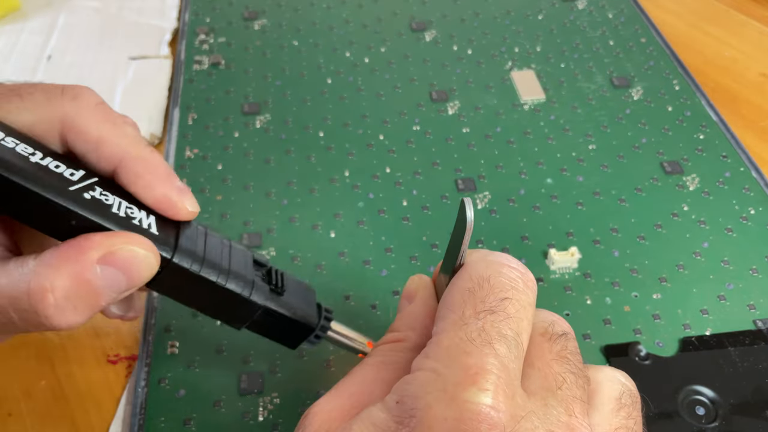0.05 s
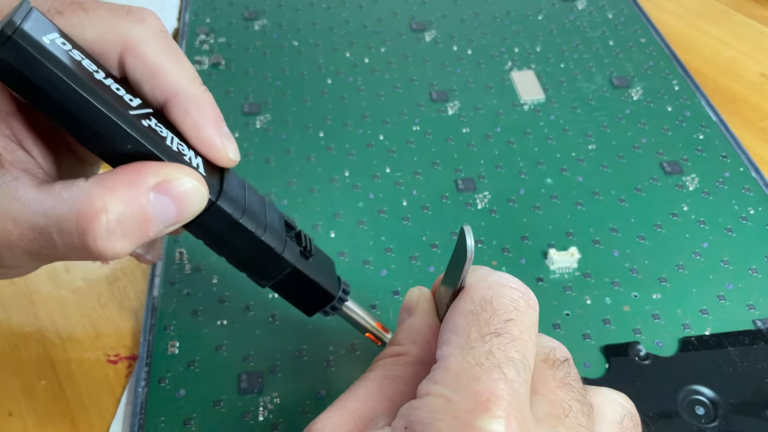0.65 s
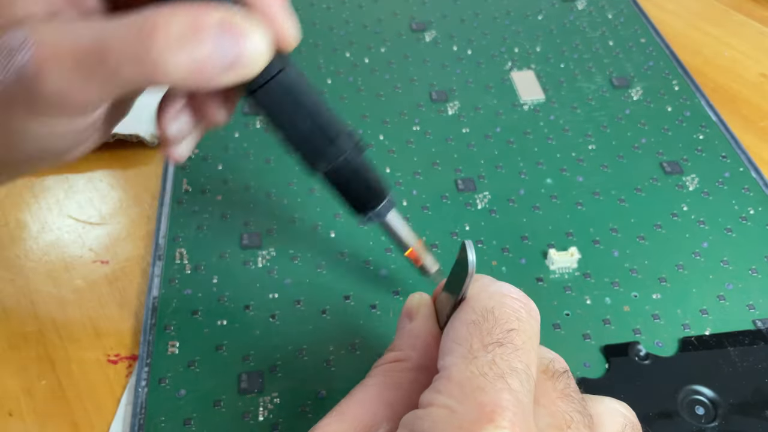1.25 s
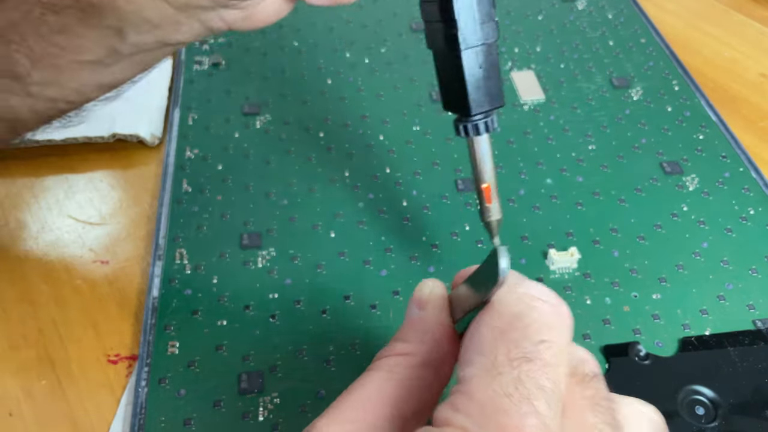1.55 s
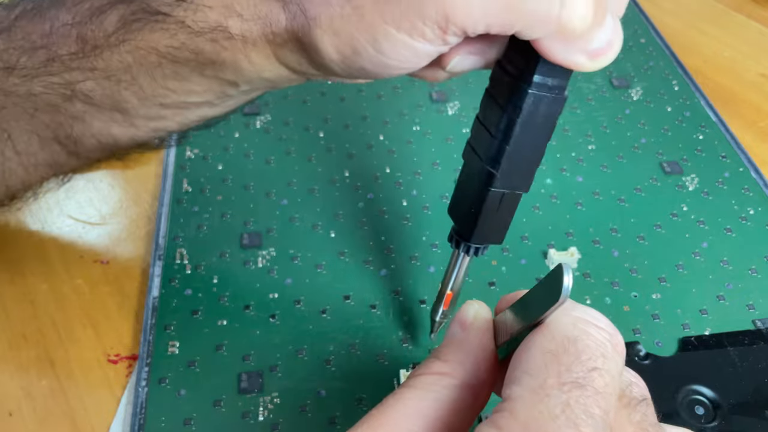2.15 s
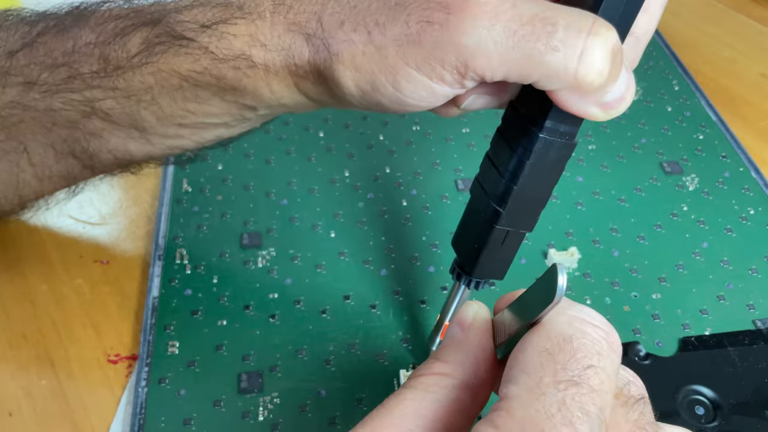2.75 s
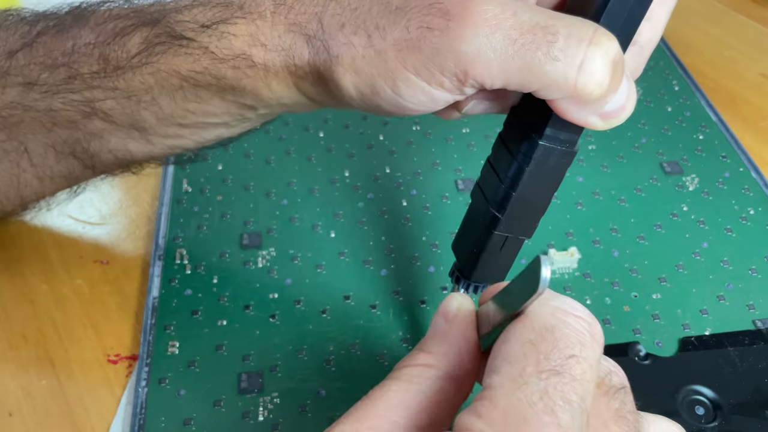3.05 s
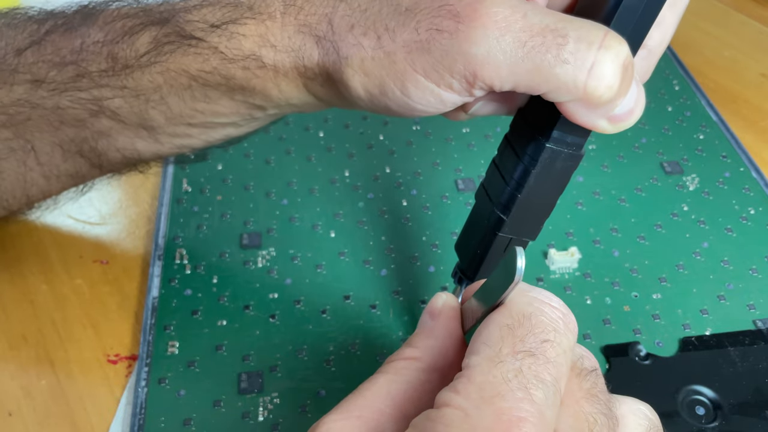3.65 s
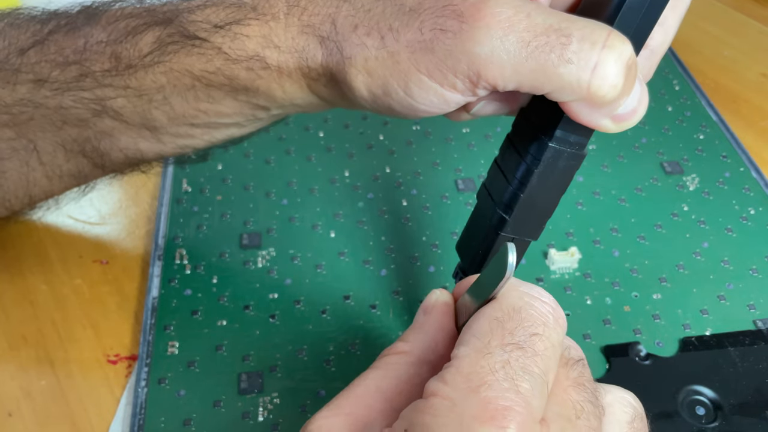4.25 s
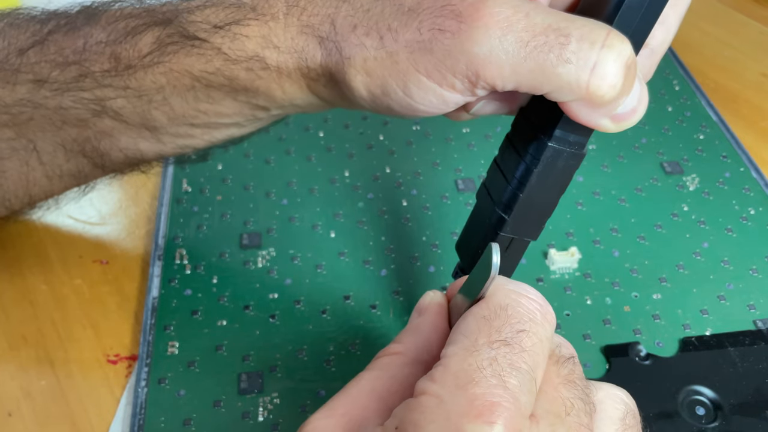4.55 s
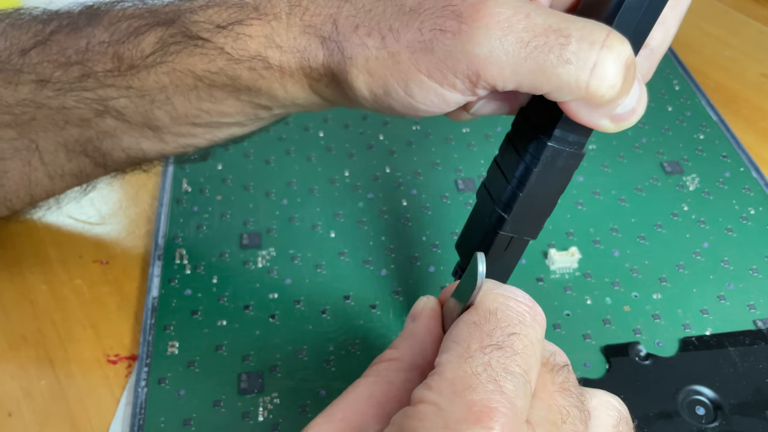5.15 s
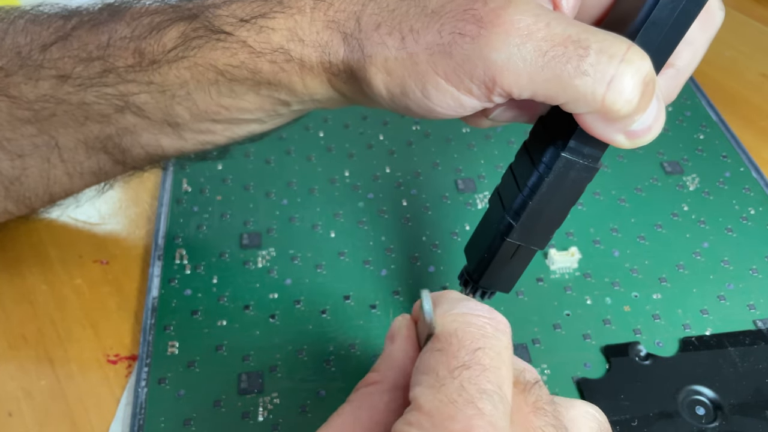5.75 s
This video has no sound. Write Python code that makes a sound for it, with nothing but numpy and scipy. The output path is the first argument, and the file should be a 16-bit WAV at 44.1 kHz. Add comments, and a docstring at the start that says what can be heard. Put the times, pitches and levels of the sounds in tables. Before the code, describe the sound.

A gas soldering iron hisses steadily, with light clicks of metal tweezers and small knocks on a circuit board.

```python
"""A butane soldering iron hisses close by as it is moved over a circuit board on a wooden table.
Turbulent gas rushes from the nozzle, burns in the barrel and excites the resonances of the exhaust ports;
their ring shifts as the iron is turned. Impacts excite decaying normal modes: the tip clicks against
steel tweezers and knocks on the board, the tweezers drag, and hands bump the table. Flux spits on the tip.
Something hums faintly in the small room; one microphone hears it all."""
import sys
import numpy as np
from scipy import signal
from scipy.fft import rfft, irfft
from scipy.io import wavfile

SR = 44100
rng = np.random.default_rng(int(sys.argv[2]) if len(sys.argv) > 2 else 0)


def dump_mix(stems):
    """Bounce the given channels to the path in sys.argv[1] as a 16-bit WAV at rate SR."""
    frames = np.atleast_2d(stems).T  # one column per channel
    limited = np.clip(frames, -1, 1)  # hard clip at full scale
    pcm = np.round(limited * 32767).astype(np.int16)
    wavfile.write(sys.argv[1], SR, pcm)


N = 260190

# The iron swings from left through upright to right. Each row: time in seconds, lean in degrees.
LEAN = [(0, -70), (.32, -66.5), (.41, -57), (1.14, -50.5), (1.26, -27), (1.46, -15), (1.67, -11), (1.8, -3),
        (2.25, 17.5), (2.6, 29.5), (3.1, 32.5), (5.9, 40)]
# Fingers shift around the ports. Each row: centre in seconds, half length in seconds, change in dB.
FINGER_SHADES = [(0.419, 0.037, -5), (1.25, 0.023, -4.5), (1.31, 0.031, -13.5), (3.176, 0.29, -4)]

def iron():
    """Flow noise: jet, flame and ports add up to a hiss, coloured by the lean and shaded by the fingers."""
    t, (lean,) = np.arange(N) / SR, in_time(LEAN)
    shade_db = sum(db * lobe(t, s, half_length) for s, half_length, db in FINGER_SHADES)
    hiss = from_db(shade_db) * ports(lean)
    hiss += from_db(.59 * shade_db) * (jet(lean) + combustion(lean))   # these are shaded less
    flutter_db = .5 * drift(rate=50)   # the gas flow is never quite even
    hiss = board_interference(hiss * from_db(flutter_db), lean)
    return hiss + from_db(shade_db + flutter_db) * overtones(lean)


# Each aim: base level in dB, change in dB around one lean, that lean and its spread in degrees.
LOWER_PORT_AIM, UPPER_PORT_AIM = (-58, 8.5, -25, 49), (-48, -2.5, -12, 41.5)
NOZZLE_AIM = (-66, 8, 12, 19.5)
LOWER_PORT_HZ, LOWER_HZ_PER_DEGREE, UPPER_PORT_HZ = 3560, 5.5, 4092
REST_S, CREEP_HZ_PER_S = 3.4, 38   # once the iron is nearly at rest, the upper port creeps sharp

def ports(lean):
    """Resonance: turbulence sounds the nozzle and two exhaust ports; the ports' pitch follows the lean."""
    t = np.arange(N) / SR
    lower_hz = LOWER_PORT_HZ + LOWER_HZ_PER_DEGREE * lean
    sag_hz = 110 * lobe(lean, centre=7, spread=14)   # as the iron passes upright
    upper_hz = UPPER_PORT_HZ - sag_hz + CREEP_HZ_PER_S * np.maximum(t - REST_S, 0)
    lower = aimed(lean, LOWER_PORT_AIM) * blown(lower_hz, width_hz=410, order=2)
    upper = aimed(lean, UPPER_PORT_AIM) * blown(upper_hz, width_hz=303, order=1)
    nozzle = aimed(lean, NOZZLE_AIM) * blown(8355, width_hz=700, order=4)
    return lower + upper + nozzle


JET_AIM = (-64.5, 10, -10, 28)
# The spectrum of the gas jet. Each row: frequency in Hz, relative density in dB.
JET_SPECTRUM = [(3500, -49), (4800, 4.5), (5600, 3), (6250, -0.5), (6800, 4), (7200, 6), (7700, 4),
                (8600, -17.5), (9500, -20.5), (11500, -24), (13000, -36), (16500, -70)]

def jet(lean):
    """Turbulent mixing: gas leaving the nozzle radiates a high band of noise."""
    return aimed(lean, JET_AIM) * noise(JET_SPECTRUM)


FLAME_AIM, BARREL_AIM = (-67, -14, 8, 17.5), (-55.5, -17, .5, 13)
# The spectra of the flame and of the burning in the barrel. Each row: frequency in Hz, relative dB.
FLAME_SPECTRUM = [(300, 2.5), (620, -3.5), (800, -18), (1080, 0.5), (1450, -6.5), (2000, -3), (3000, -42),
                  (6000, -53)]
BARREL_SPECTRUM = [(1500, -20.5), (2080, -10.5), (2350, 1.5), (2720, 2.5), (3050, 0), (3750, 1.5),
                   (4650, 3), (5200, -2.5), (6000, -36), (9500, -19.5), (11600, -27), (13000, -41),
                   (15000, -68)]

def combustion(lean):
    """Combustion noise: unsteady burning gives a low and a bright rush, both weakest near upright."""
    flame = aimed(lean, FLAME_AIM) * noise(FLAME_SPECTRUM)
    barrel = aimed(lean, BARREL_AIM) * noise(BARREL_SPECTRUM)
    return flame + barrel


# Resonances of the barrel and ports. Each row: frequency and width in Hz, base level in dB,
# gain in the beam in dB, the beam's lean and spread in degrees.
OVERTONES = [(2680, 260, -66, 4, 22, 19), (3500, 220, -90, 32, -12.5, 7), (5850, 300, -82, 12, 39, 2.5),
             (6680, 260, -75, 4, 39, 4), (7020, 240, -88, 21, -15, 4.5), (8200, 260, -84, 23, 7, 13),
             (8420, 280, -84, 18, -11.5, 3)]

def overtones(lean):
    """Beaming: each narrow resonance is loudest around one lean."""
    return sum(aimed(lean, aim) * blown(hz, width_hz, order=3) for hz, width_hz, *aim in OVERTONES)


# Cancelled bands. Each row: lean and spread in degrees, frequency in Hz, slope in Hz per degree,
# depth from 0 to 1, width in Hz.
ECHO_DIPS = [(-49, 33, 3680, -10, .9, 610), (-56.5, 11.5, 7500, 74, 0.67, 1700),
             (49, 15.2, 3975, 12.5, 0.98, 250), (-13, 7.5, 7700, -20, .75, 1200),
             (-13, 7, 6300, -25, .8, 900), (-13, 7.5, 4050, 10, .68, 600), (10, 28, 3220, 7, .6, 260),
             (2, 10, 4950, 16, .8, 520), (0, 7, 3850, 0, .3, 900), (0, 8, 9150, 20, .75, 700),
             (5, 11, 6600, 5, .5, 600), (21, 14, 3810, 0, .45, 170), (21, 13, 4750, 15, .68, 560),
             (33, 10, 5480, 0, .4, 400), (31, 14, 7200, 0, .6, 600)]

def board_interference(hiss, lean):
    """Destructive interference: the echo off the board notches the hiss around certain leans."""
    for centre, spread, hz, hz_per_degree, depth, width_hz in ECHO_DIPS:
        dip_hz = hz + hz_per_degree * (lean - centre)
        hiss = notch(hiss, dip_hz, depth * lobe(lean, centre, spread, AIM_EDGE), width_hz)
    return hiss


# Steel strikes steel. Each row: start in seconds, level in dB.
CLICKS = [(.888, -42.5), (3.5036, -33), (3.7601, -35.5), (3.8698, -35.5), (1.2793, -11), (1.372, -35),
          (4.229, -47), (4.536, -42.5), (4.769, -47), (5.4946, -42), (5.502, -37), (5.517, -40),
          (5.88, -29.5)]
# Modes of the tip and tweezers, the lowest from the board beneath.
# Each row: frequency in Hz, relative level in dB, 60 dB decay time in seconds.
STEEL_MODES = [(894, -14, 0.018), (1170, -14.5, 0.019), (2640, -5, 0.005), (2980, -8, 0.019),
               (3627, -0.5, 0.01), (3850, -2, 0.014), (4445, -0.5, 0.012), (4740, -6, 0.023),
               (5570, 1.5, 0.0081), (6560, -7, 0.025), (7440, -5.5, 0.01), (9360, -2.5, 0.0023),
               (14500, -19, 0.0033)]

def steel():
    """Damped modal vibration: the tip chatters against the tweezers while the fingers damp both."""
    force = blows(*np.transpose(CLICKS))
    force = force + from_db(-6.5) * delayed(force, .001152) + from_db(-13) * delayed(force, .004)
    return from_db(-2.5) * high_pass(ring_modes(force, STEEL_MODES), hz=450, order=2)   # too small for bass


# Tweezer pings. Each row: start in seconds, level in dB, frequency in Hz.
PINGS = [(.888, -46, 2750), (.987, -39, 2270), (3.5036, -38, 2430), (3.7601, -42, 2450),
         (3.8698, -42, 2400), (4.116, -39.5, 2450)]

def pings():
    """Free vibration of a cantilever: an arm of the tweezers springs loose and rings briefly."""
    return sum(ring(blows(np.array([s]), db), hz, t60=.024) for s, db, hz in PINGS)


# Knocks on the board. Each row: start in seconds, level in dB, hardness in dB per octave, # thud relative to
# tap in dB, share of the free decay time left by the damping hand.
KNOCKS = [(.1355, -43, -2, 5, .7), (.766, -44, -3, 9, .7), (2.618, -43, -4, 1, .7),
          (4.537, -45, -2, -3, .6), (4.576, -46, -2, -3, .6), (4.716, -46, -1, -2, .5),
          (.8878, -31.5, 0, -5, .6), (.987, -36.5, 0, 6, .55), (4.115, -41, 1.5, -3, .5),
          (4.9955, -35.5, -.5, -4, .6), (5.0387, -36, -1, 5, .6), (2.7108, -21, 0, 0, .85),
          (2.7176, -33, .5, -6, .85), (2.8251, -22, -.7, 1.5, .85), (2.8320, -35, .5, -6, .85),
          (3.5034, -26.5, -1.5, 6, .65), (3.7599, -31, -1, 8.5, .65), (3.8696, -30.5, -1, 8, .6)]
# The board's modes. Each row: frequency in Hz, relative level in dB, 60 dB decay time in seconds.
BOARD_MODES = [(235, -22, .03), (340, -17.5, .028), (445, -14, .038), (905, -1, .018), (1130, -2.5, .012),
               (1570, -8, .005), (1950, -8, .005), (2480, -7.5, .0095), (3300, -12, .005),
               (4170, -6, .0035), (5150, -7.5, .0051), (6670, -12.5, .0075), (8800, -6, .0015),
               (14000, -9, .0012)]
SPOT_DB, LOAD_DETUNE = 1.5, .03   # a mode's strength varies with the spot, its pitch with the hands' load

def board():
    """Plate vibration: each knock gives a damped tap, a thud from the edge and a rattle; tweezers drag."""
    hz, mode_db, t60 = np.transpose(BOARD_MODES)[:, :, None]
    t = np.arange(round(.08 * SR)) / SR
    signs = (-1) ** np.arange(len(BOARD_MODES))[:, None]
    spots = rng.standard_normal((len(KNOCKS), 2, len(BOARD_MODES), 1))
    taps, thuds = np.zeros(N + SR), np.zeros(N + SR)
    for (s, db, hardness, thud_db, ring_share), (strength, detune) in zip(KNOCKS, spots):
        gain = signs * from_db(db + mode_db + hardness * np.log2(hz / 1000) + SPOT_DB * strength)
        modes = np.sin(2 * np.pi * hz * (1 + LOAD_DETUNE * detune) * t)
        tap = np.sum(gain * decay(t, t60 * ring_share) * modes, axis=0)
        start = round(s * SR)
        taps[start:start + len(t)] += tap
        thuds[start:start + len(t)] += from_db(thud_db) * tap
    taps, thuds = taps[:N], thuds[:N]
    plate = taps + edge_return(thuds) + rattle(taps, t) + drag()
    return high_pass(plate, hz=149, order=2)   # a thin plate radiates little bass


ROUND_TRIP_S = .0058   # to the board's edge and back, at 1 kHz

def edge_return(x):
    """Dispersion: bending waves come back dulled from the board's edge, the low ones last."""
    hz = np.fft.rfftfreq(N + SR, 1 / SR)
    phase = 4 * np.pi * ROUND_TRIP_S * np.sqrt(1000 * hz)
    dispersed = irfft(rfft(x, N + SR) * np.exp(-1j * phase), N + SR)[:N]
    return low_pass(dispersed, hz=510, order=3)


def rattle(taps, t):
    """Intermittent contact: the loose board chatters on the table for a moment after each knock."""
    chatter = sparse_impulses(len(t), per_second=2500) * (t > .0062) * np.exp(-t / .005)
    bounces = signal.fftconvolve(taps, chatter / np.linalg.norm(chatter))[:N]
    return from_db(-7) * low_pass(bounces, hz=3170, order=1)


# The tweezers drag over the board. Each row: time in seconds, level in dB.
DRAG_LEVEL = [(.11, -74), (.14, -47.5), (.16, -64), (.18, -51.5), (.23, -61), (.27, -102)]

def drag():
    """Stick-slip friction: the tweezer points ring the board's low modes under a dry scratch."""
    friction = sparse_impulses(N, per_second=700)
    body = rms_one(low_pass(ring_modes(friction, BOARD_MODES), hz=430, order=4))
    rasp = from_db(-5) * rms_one(low_pass(friction, hz=1600, order=2))
    return from_db(in_time(DRAG_LEVEL)[0]) * (body + rasp)


# The hands press and bump the table. Each row: start in seconds, level in dB.
HAND_BUMPS = [(3.199, -56.5), (5.351, -53), (5.388, -56)]
# The table's modes. Each row: frequency in Hz, relative level in dB, 60 dB decay time in seconds.
TABLE_MODES = [(87.4, -9, 0.37), (107.4, -7.5, 0.64), (238, 15.5, 0.011), (610, -1, 0.019)]
KNOCK_TO_TABLE_DB = -33.5

def table():
    """Structure-borne sound: the hands and the knocks on the board excite the table top's dull modes."""
    knock_s, knock_db, *_ = np.transpose(KNOCKS)
    force = blows(*np.transpose(HAND_BUMPS)) + blows(knock_s, knock_db + KNOCK_TO_TABLE_DB)
    return sum(from_db(db) * ring(force, hz, t60) for hz, db, t60 in TABLE_MODES)


# Flux spits on the hot tip. Each row: start in seconds, level in dB.
FLUX_SPITS = [(.293, -62), (.3895, -60)]

def flux():
    """Impulse excitation: tiny bubbles burst in the flux with a very high, thin tick."""
    return high_pass(ring(blows(*np.transpose(FLUX_SPITS)), hz=14000, t60=.0006), hz=9500, order=3)


def early_echoes(x, db, spread_s):
    """Comb filtering: reflections from hands, board and table ripple the spectrum of the direct sound."""
    t = np.arange(round(.02 * SR)) / SR
    echoes = rng.standard_normal(len(t)) * (t > .002) * np.exp(-t / spread_s)
    return x + from_db(db) * signal.fftconvolve(x, echoes / np.linalg.norm(echoes))[:N]


def room(x, t60, treble_t60, split_hz, treble_db):
    """Reverberation: dense reflections build up quickly and die sooner in the treble."""
    t, scatter = np.arange(N) / SR, rng.standard_normal(N)
    low = low_pass(scatter, split_hz)
    tail = low * decay(t, t60) + from_db(treble_db) * (scatter - low) * decay(t, treble_t60)
    onset = np.clip((t - .004) / .00049, 0, 1)
    return signal.fftconvolve(x, tail * onset / np.sqrt(SR * t60 / np.log(1e6)))[:N]


# The tones of the hum. Each row: frequency in Hz, level in dB.
HUM_TONES = [(193.8, -62.5), (269.2, -79), (306.8, -68), (387.6, -71.5), (619.1, -80.5)]
# The hum sinks and swells. Each row: time in seconds, gain in dB.
HUM_SWELL = [(0, 0.5), (1.5, 0), (1.95, -2), (2.55, -1.5), (2.85, 2), (3.2, 5), (3.5, -1), (5.9, 0.5)]

def hum():
    """Random modulation: low tones waver slightly in pitch and level."""
    tones = 0
    for hz, db in HUM_TONES:
        phase = 2 * np.pi * np.cumsum(hz * (1 + .00537 * drift(rate=5))) / SR
        waver_db = 1.6 * drift(rate=5)
        tones = tones + np.sqrt(2) * from_db(db + waver_db) * np.sin(phase)
    return tones * from_db(in_time(HUM_SWELL)[0])


# The spectrum of the room's air. Each row: frequency in Hz, relative density in dB.
AIR_SPECTRUM = [(10, -3), (28, 2), (70, -6), (110, -6), (170, -1.5), (250, -1), (350, -0.5), (460, -1),
                (560, -13.5), (1100, -9.5), (1500, -15), (4000, -6), (14000, -67)]

def air():
    """Ambient noise: a steady murmur of air in the room."""
    return from_db(-61) * noise(AIR_SPECTRUM)


AIM_EDGE = 7.1   # how abruptly the swells and dips end as the iron leans

def aimed(lean, aim):
    """Directivity: the gain of one part of the iron towards the microphone at each lean."""
    db, change_db, centre, spread = aim
    return from_db(db + change_db * lobe(lean, centre, spread, AIM_EDGE))


def blown(hz, width_hz, order):
    """Narrow-band noise: a resonance driven by turbulence wanders as fast as it is wide."""
    phase = 2 * np.pi * np.cumsum(hz * np.ones(N)) / SR
    return rms_one(drift(width_hz, order) * np.cos(phase) + drift(width_hz, order) * np.sin(phase))


def noise(spectrum):
    """Spectral shaping: steady noise of a given spectrum, at unit power."""
    hz, db = np.transpose(spectrum)
    gain = from_db(np.interp(np.log(np.fft.rfftfreq(N, 1 / SR) + 1), np.log(hz), db))
    return rms_one(irfft(rfft(rng.standard_normal(N)) * gain, N))


def drift(rate, order=1):
    """Random fluctuation of unit power; a higher order cuts it more steeply above its rate in Hz."""
    gain = (1 + (np.fft.rfftfreq(N, 1 / SR) / rate) ** 2 / order) ** -order
    return rms_one(irfft(rfft(rng.standard_normal(N)) * gain, N))


def sparse_impulses(length, per_second):
    """Shot noise: impulses of random size at random times."""
    return rng.standard_normal(length) * (rng.random(length) < per_second / SR)


def blows(times, db):
    """Impulsive force: one impulse for each contact."""
    force = np.zeros(N)
    force[np.clip(np.round(times * SR).astype(int), 0, N - 1)] = from_db(db)
    return force


def ring(force, hz, t60):
    """Damped oscillator: a unit impulse sets a sine of height 1 ringing."""
    r, w = decay(1 / SR, t60), 2 * np.pi * hz / SR
    return signal.lfilter([0, np.sin(w)], [1, -2 * r * np.cos(w), r * r], force + 1e-18)


def ring_modes(force, modes):
    """Modal superposition: one force drives all modes, which add with alternating signs."""
    return sum((-1) ** k * from_db(db) * ring(force, hz, t60) for k, (hz, db, t60) in enumerate(modes))


def notch(x, hz, depth, width_hz, block=128):
    """Cancellation: subtracting a resonant band leaves a dip, retuned block by block."""
    band, state, r = np.zeros(N), np.zeros(2), np.exp(-np.pi * width_hz / SR)
    for i in range(0, N, block):
        feedback = [1, -2 * r * np.cos(2 * np.pi * hz[i] / SR), r * r]
        band[i:i + block], state = signal.lfilter([1, 0, -1], feedback, x[i:i + block], zi=state)
    return x - np.clip(depth, 0, 1) * band * (1 - r * r) / 2


def low_pass(x, hz, order=2):
    """Attenuation of the treble."""
    return signal.sosfilt(signal.butter(order, hz, fs=SR, output="sos"), x)


def high_pass(x, hz, order):
    """Attenuation of the bass."""
    return signal.sosfilt(signal.butter(order, hz, "high", fs=SR, output="sos"), x)


def delayed(x, seconds):
    """Pure delay: the same signal a little later."""
    return np.interp(np.arange(N) - seconds * SR, np.arange(N), x, left=0)


def decay(t, t60):
    """Exponential decay: 60 dB in t60 seconds."""
    return np.exp(-np.log(1000) * t / t60)


def lobe(x, centre, spread, edge=2):
    """A bell curve of height 1; a higher edge flattens its top and steepens its sides."""
    return np.exp(-np.abs((x - centre) / spread) ** edge)


def in_time(rows):
    """Linear interpolation: each column of a curve at every sample."""
    s, *columns = np.transpose(rows)
    return [np.interp(np.arange(N) / SR, s, c) for c in columns]


def rms_one(x):
    """Normalisation to unit power."""
    return x / np.sqrt(np.mean(x ** 2) + 1e-20)


def from_db(db):
    """Decibels to amplitude ratio."""
    return 10 ** (np.asarray(db) / 20)


def scene():
    """Superposition: the iron, the contacts and their reverberation add to the room's hum and air."""
    knocks = low_pass(board(), hz=9600, order=3)
    clicks = low_pass(steel() + pings(), hz=12600, order=2)
    boom = from_db(-2) * low_pass(knocks, hz=530, order=1)   # the low modes spread widest into the room
    clack = from_db(-8.5) * low_pass(clicks, hz=1300, order=2)
    into_room = low_pass(from_db(-12.5) * knocks + boom + from_db(-10) * clicks + clack, hz=8100)
    reverb = room(into_room, t60=1.0, treble_t60=.57, split_hz=3260, treble_db=-1)
    hiss = early_echoes(iron(), db=-16, spread_s=.005)
    mono = hiss + knocks + clicks + flux() + table() + reverb + hum() + air()
    return np.array([mono, mono])


CUTOFF_HZ, CONVERTER_OFFSET = 16500, -.0025

def record(dry):
    """Band limiting: a steep filter cuts the top, and the converter sits a little below zero."""
    return signal.sosfilt(signal.ellip(10, .1, 80, CUTOFF_HZ, fs=SR, output="sos"), dry) + CONVERTER_OFFSET


dry = scene()
out = record(dry)
dump_mix(out)
```